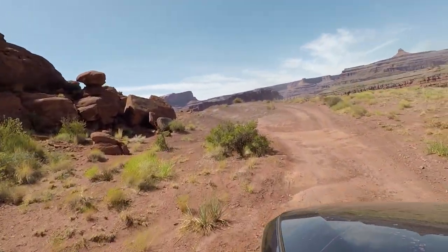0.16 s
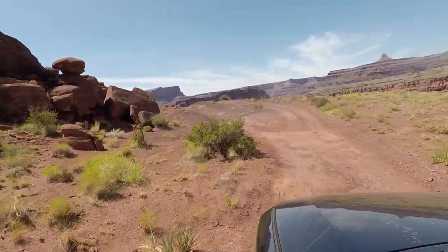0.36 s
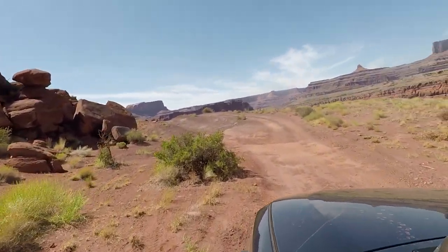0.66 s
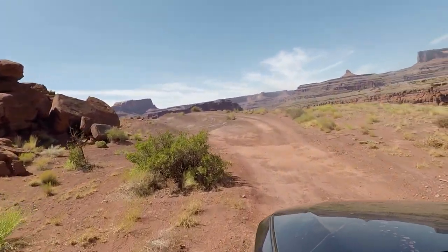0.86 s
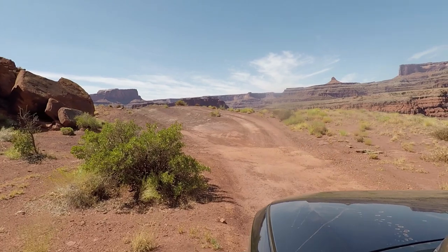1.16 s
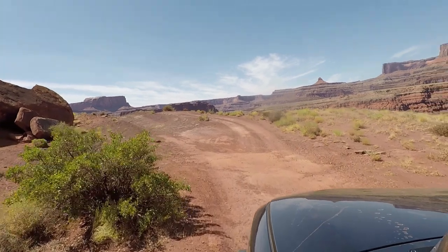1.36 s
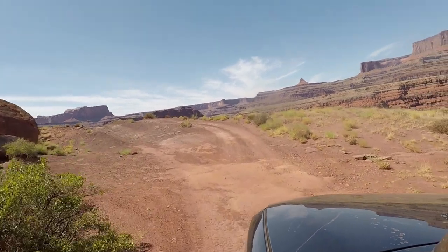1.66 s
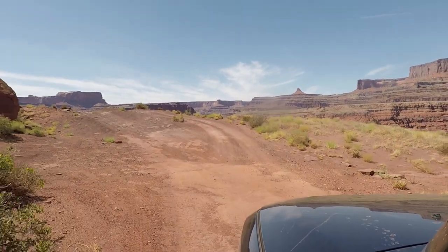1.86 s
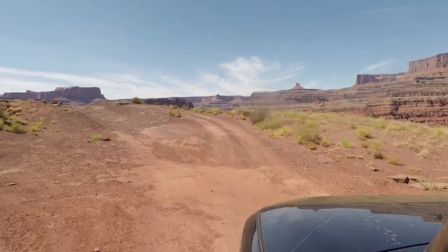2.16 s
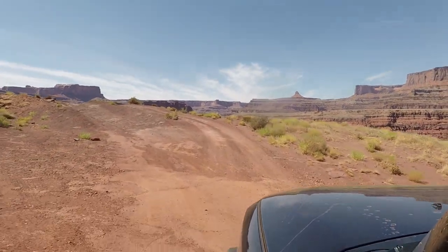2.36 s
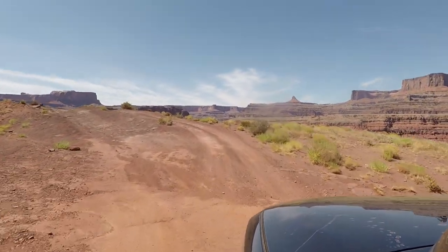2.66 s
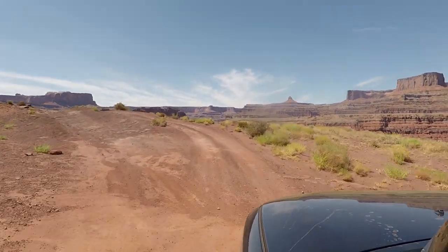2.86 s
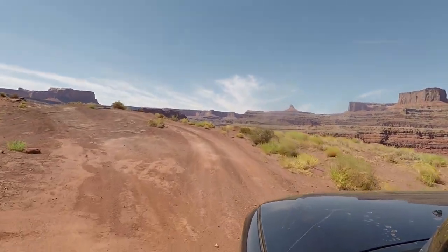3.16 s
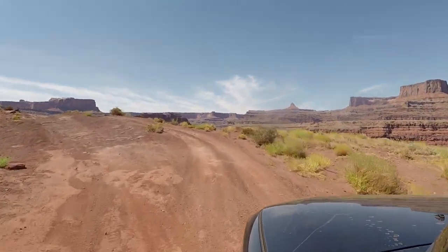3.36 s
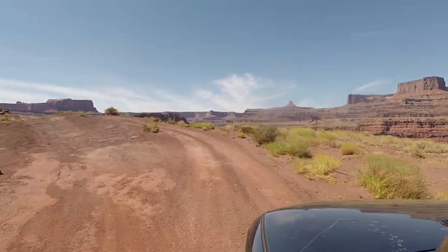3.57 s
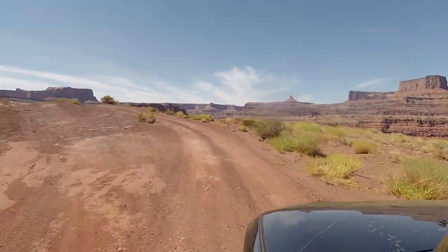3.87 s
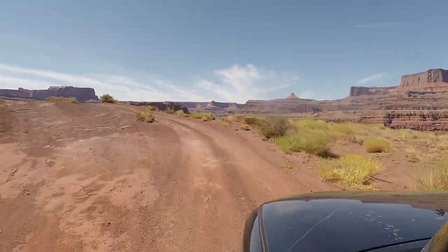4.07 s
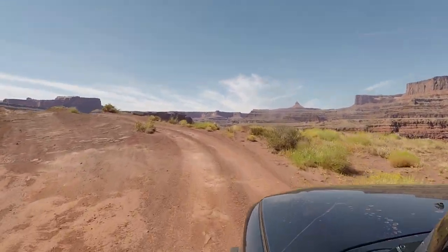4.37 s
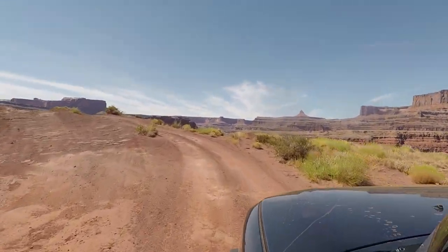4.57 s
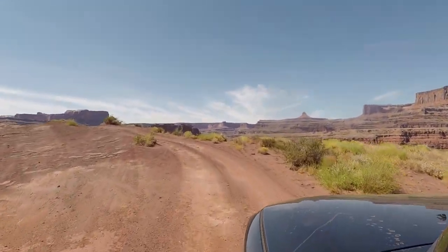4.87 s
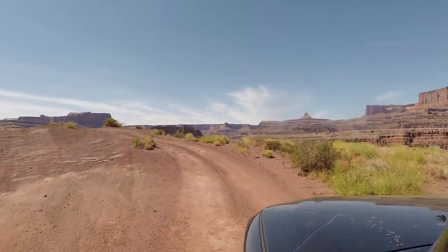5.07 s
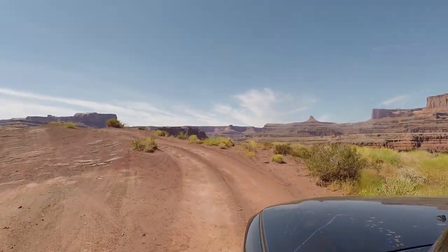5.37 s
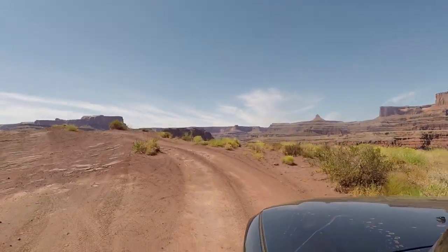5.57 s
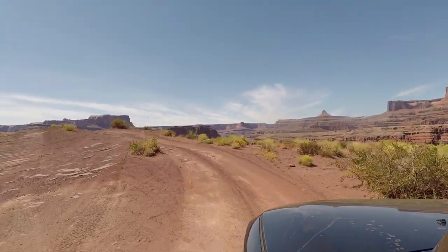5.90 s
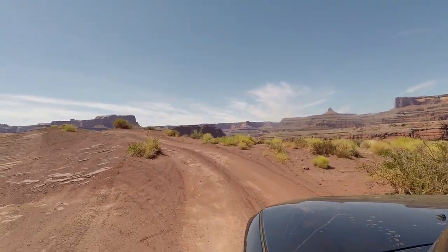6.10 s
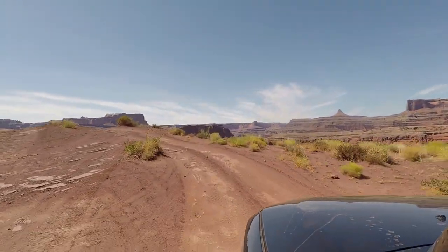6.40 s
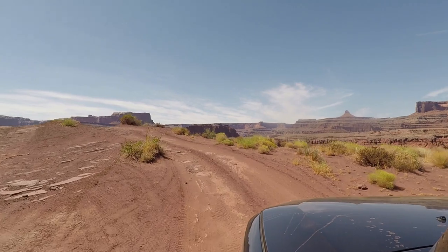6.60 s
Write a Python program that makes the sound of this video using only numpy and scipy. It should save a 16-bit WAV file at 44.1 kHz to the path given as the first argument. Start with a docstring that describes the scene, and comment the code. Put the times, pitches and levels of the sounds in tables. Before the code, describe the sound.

A body-mounted microphone hears tyres rumbling and crunching along a dry dirt track, low thuds from the suspension and bright pebbles snapping against panels. The engine is barely audible at first, then gains a little speed as the bumps thin out. After a brief dip in pitch it takes throttle and swells into a deep, rough climb, with softer crunching, scattered knocks and a late metallic clack beneath it. Dry and outdoors.

```python
"""A V6 off-roader crawls along a rocky dirt trail, heard from a camera on its body.
At first the engine coasts: the body shudders over ruts as swept low sines, shaped noise rumbles and
crunches under the tyres, and struck modes and filtered bursts give suspension knocks and ticking stones.
The coasting engine gains speed and a belt-driven whine stands out twice. Then the engine sags and pulls
hard up a slope: crank-order sines glide through pipe resonances, with a boom and noise pulsed by firings."""
import sys
import numpy as np
from scipy import signal
from scipy.fft import rfft, irfft
from scipy.io import wavfile

SR = 44100
rng = np.random.default_rng(int(sys.argv[2]) if len(sys.argv) > 2 else 0)


def wav_out(sig):
    """Save sig, one row per channel (or a flat mono array), as 16-bit PCM at SR to the path in sys.argv[1]."""
    wavfile.write(sys.argv[1], SR, np.round(np.clip(np.atleast_2d(sig).T, -1, 1) * 32767).astype(np.int16))


N = 297234
TIME = np.arange(N) / SR  # [s]
RING = np.arange(SR // 5) / SR  # time since an impact [s]

# panel resonances that stones and chippings ring: (frequency [Hz], relative level [dB per Hz])
PANELS = [(300, -25), (1000, -8), (1500, 0), (1850, -7), (2200, 1), (2600, -5), (3050, -1), (3400, -7),
          (3900, 1), (4500, -5), (5300, -11), (6600, -12), (7500, -5), (8000, -7), (8700, -4), (10000, -10),
          (12500, -17), (15000, -32)]
# tyres plough through loose patches: (start [s], length [s], spray level [dB], crunch level [dB])
LOOSE_PATCHES = [(0.333, 0.087, -59.5, -39), (0.495, 0.28, -60, -46), (1.077, 0.073, -58, -40.5),
                 (1.216, 0.06, -50.5, -42), (1.297, 0.13, -59.5, -41), (1.513, 0.058, -56, -40),
                 (1.751, 0.2, -52.5, -39.5), (1.805, .14, -52.5, -54), (2.246, 0.17, -58.5, -47)]
PATCH_ATTACK_S, PATCH_RELEASE_S = 0.021, 0.061


def amp(db):
    """Level law: decibels to amplitude gain."""
    return 10 ** (np.asarray(db) / 20)


def unit(x):
    """Power normalization: scales to rms 1."""
    return x / np.sqrt(np.mean(x ** 2) + 1e-20)


def curves(rows):
    """Linear interpolation: each column of a table as a curve over time."""
    s, *columns = np.transpose(rows)
    return [np.interp(TIME, s, column) for column in columns]


def colour(x, points):
    """Spectral shaping: filters x, with a steep fall beyond the end points; rms 1."""
    f, db = np.transpose(points)
    octave = np.log2(np.fft.rfftfreq(len(x), 1 / SR) + 1)
    knots = np.log2(f)
    outside = np.maximum(knots[0] - octave, 0) + np.maximum(octave - knots[-1], 0)
    gain = amp(np.interp(octave, knots, db) - 36 * outside)  # the end level falls 36 dB per octave
    return unit(irfft(rfft(x) * gain, len(x)))


def drift(hz):
    """Low-pass random fluctuation: a Gaussian spectrum fades out around hz; rms 1."""
    f = np.fft.rfftfreq(N, 1 / SR)
    lowpass = np.exp(-(f / hz) ** 2) * (f > 0)
    return unit(irfft(rfft(rng.standard_normal(N)) * lowpass, N))


def grains(per_s, spread_db):
    """Shot noise: random impacts, many small and a few large; rms 1."""
    size = amp(spread_db * np.minimum(rng.exponential(1, N), 4))
    sign = rng.choice([-1, 1], N)
    hit = rng.random(N) < per_s / SR
    return unit(size * sign * hit)


def add(mix, s, sound):
    """Superposition: mixes a sound in at time s."""
    part = mix[round(s * SR):][:len(sound)]
    part += sound[:len(part)]


def swell(start, length, db, attack_s, release_s):
    """Envelope: a linear rise and a hold until the length is over, then exponential decay."""
    age = TIME - start
    rise = np.clip(age / attack_s, 0, 1)
    decay = np.exp(-np.maximum(age - length, 0) / release_s)
    return amp(db) * rise * decay


def together(*gains):
    """Incoherent addition: the level in dB of several gains whose powers add."""
    return 10 * np.log10(sum(g ** 2 for g in gains) + 1e-20)


def strike(modes, scrape, scrape_s):
    """Modal impact: a cushioned blow and a short scrape ring a set of modes; rms 1 over the first 15 ms."""
    ring = np.zeros(len(RING))
    for k, (hz, db, t60) in enumerate(modes):
        swelling = 1 - np.exp(-(2 * hz * RING) ** 2)  # over the first half of the mode's own cycle
        decay = amp(db - 60 * RING / t60)
        ring += (-1) ** k * decay * np.sin(2 * np.pi * hz * RING) * swelling
    contact = rng.standard_normal(len(RING)) * np.exp(-RING / scrape_s)
    contact /= np.linalg.norm(contact)
    sound = ring + scrape * signal.fftconvolve(ring, contact)[:len(RING)]
    return sound / np.std(sound[RING < .015])


def shove(hz):
    """Transient pulse: one dull push and rebound of the body, centred on hz; rms 1 over the first 15 ms."""
    u = np.pi * (hz * RING - .8)
    pulse = (2 * u ** 2 - 1) * np.exp(-u ** 2)
    return pulse / np.std(pulse[RING < .015])


def snap(db, tone, t60):
    """Source and filter: a decaying burst of contact noise rings a resonant shell; db is its peak."""
    burst = rng.standard_normal(len(RING)) * amp(-60 * RING / t60) * (1 - np.exp(-RING / 0.0002))
    f, level = np.transpose(tone)
    frequency = abs(np.fft.fftfreq(len(RING), 1 / SR))
    log_gain = np.log(amp(np.interp(frequency, f, level)))
    # minimum phase: the shell rings after the contact, never before it
    shell = np.exp(np.conj(signal.hilbert(log_gain)))
    sound = np.fft.ifft(np.fft.fft(burst) * shell).real
    return amp(db) * sound / abs(sound).max()


def effort():
    """Engine load in dB relative to a hard pull: low while coasting, high on the climb."""
    # (time [s], effort [dB])
    load = [(0, -56), (1.1, -18), (2.5, -8.5), (3.2, -25), (3.8, -25), (4.4, -14), (4.68, -10.5),
            (5.0, -4.5), (5.27, -0.5), (5.9, 0.5), (6.33, 1.5), (6.7, 1.5)]
    return curves(load)[0]


def ground():
    """Powers of the trail, its ledges and loose patches add: levels in dB of rumble, drum, crunch and grit."""
    # the trail under the tyres: (time [s], rumble level [dB], gravel crunch level [dB])
    trail = [(0, -20.5, -41), (.3, -28.5, -44.5), (1.4, -24, -40.5), (1.65, -28, -40), (2.12, -20.5, -44),
             (2.4, -23, -43.5), (3.17, -23, -46.5), (3.7, -31.5, -50.5), (4.2, -30.5, -48),
             (4.7, -32.5, -47), (5.05, -33, -47.5), (5.5, -30, -37.5), (6.05, -24, -45), (6.7, -26.5, -43)]
    # the wheels drop over ledges: (start [s], length [s], rumble level [dB], drumming level [dB])
    ledges = [(0.491, 0.18, -19.5, -32.5), (0.748, 0.099, -20, -36), (1.086, 0.23, -32.5, -32.5),
              (1.789, 0.15, -22.5, -23.5), (1.97, 0.089, -19, -41), (2.423, 0.24, -22, -49)]
    ledge_attack_s, ledge_release_s = 0.04, 0.092
    # pebbles on the tread: base dB; dB per dB of trail rumble; dB gained in a hard pull
    drum_db, drum_growth, drum_climb_db = -34, 0.069, 3.5
    # sand thrown up on firm ground: base dB; dB per dB of trail crunch
    grit_db, grit_growth = -60, 0.38

    lumps_db, gravel_db = curves(trail)
    thuds = [swell(s, length, db, ledge_attack_s, ledge_release_s) for s, length, db, _ in ledges]
    scrapes = [swell(s, length, db, ledge_attack_s, ledge_release_s) for s, length, _, db in ledges]
    sprays = [swell(s, length, db, PATCH_ATTACK_S, PATCH_RELEASE_S) for s, length, db, _ in LOOSE_PATCHES]
    crunches = [swell(s, length, db, PATCH_ATTACK_S, PATCH_RELEASE_S) for s, length, _, db in LOOSE_PATCHES]
    pebbles_db = drum_db + drum_growth * (lumps_db - lumps_db.mean()) + drum_climb_db * amp(effort())
    sand_db = grit_db + grit_growth * (gravel_db - gravel_db.mean())
    return (together(amp(lumps_db), *thuds), together(amp(pebbles_db), *scrapes),
            together(amp(gravel_db), *crunches), together(amp(sand_db), *sprays))


def scatter():
    """Shot noise through panel resonances: separate chippings patter wherever the tyres plough a loose patch."""
    spray = sum(swell(s, length, db, PATCH_ATTACK_S, PATCH_RELEASE_S) for s, length, db, _ in LOOSE_PATCHES)
    relative_to_spray_db = -7
    return amp(relative_to_spray_db) * spray * colour(grains(per_s=130, spread_db=3.0), PANELS)


def stones():
    """Impact excitation of panel resonances: each stone snaps on a panel, brightest around its own centre."""
    # (time [s], peak level [dB], centre [Hz], t60 of the contact burst [s])
    hits = [(0.329, -40, 8000, 0.023), (.363, -44, 8000, .015), (0.384, -32.5, 2200, 0.011),
            (.4314, -39, 7000, .02), (0.602, -40, 2200, 0.017), (.6494, -45, 2500, 0.017),
            (.732, -50, 3500, 0.018), (0.787, -44, 2000, 0.023), (0.849, -42, 2500, .02),
            (1.0702, -43, 3500, .012), (1.1169, -42, 8000, .02), (1.139, -41, 4000, .015),
            (1.24, -36, 4800, 0.0069), (1.253, -39, 3300, .06), (1.266, -40, 3400, 0.032),
            (1.285, -41, 7500, 0.0072), (1.333, -43, 2200, .02), (1.391, -42, 6000, .02),
            (1.551, -46, 2400, .015), (1.578, -48, 7940, .012), (1.589, -36, 1900, 0.03),
            (1.602, -41, 4200, 0.024), (1.724, -40, 1600, 0.018), (1.8093, -32, 3700, 0.041),
            (1.837, -26, 2000, 0.027), (1.965, -40, 7000, .012), (1.991, -46, 10000, 0.0078),
            (2.051, -30, 7000, 0.009), (2.276, -41, 8000, .015), (2.316, -46, 9000, .012),
            (2.412, -41, 7560, 0.01), (2.708, -46, 7000, 0.011), (2.772, -33, 2200, 0.017),
            (2.92, -46, 7000, 0.013), (3.168, -40.5, 2900, 0.021), (3.402, -47, 8000, .025),
            (4.468, -45, 8100, .02), (5.333, -48, 7950, 0.017), (5.473, -41, 6000, 0.022),
            (5.999, -40.5, 9500, 0.016), (6.3366, -27, 1708, 0.03), (6.338, -30, 4200, 0.025),
            (6.3425, -27, 2370, 0.052)]
    out = np.zeros(N)
    for s, db, centre_hz, t60 in hits:
        tone = [(hz, level - 2.5 * np.log2(hz / centre_hz) ** 2) for hz, level in PANELS]
        add(out, s, snap(db, tone, t60))
    return out


def chips():
    """Impact excitation of a small shell: a chip rings the camera housing."""
    # housing resonances: (frequency [Hz], relative level [dB per Hz])
    housing = [(900, -8), (1800, 0), (2300, -5), (2800, 0), (3600, 0), (4300, -4), (5000, 1), (6000, -7),
               (7200, -6), (9000, -12), (11000, -17), (15000, -18)]
    # (time [s], peak level [dB], t60 of the contact burst [s])
    hits = [(1.165, -20, 0.0059)]
    out = np.zeros(N)
    for s, db, t60 in hits:
        add(out, s, snap(db, housing, t60))
    return out


def loose_fitting():
    """Modal impact: jolts make a loose fitting clack, each weighting its modes around a centre."""
    # (time [s], level over the first 15 ms [dB], centre [Hz])
    clacks = [(0.326, -40, 1630), (1.543, -44, 1500), (1.579, -43, 1444), (1.838, -33.5, 1710),
              (1.861, -36, 1620), (1.925, -42, 1150), (2.006, -42, 1150), (2.771, -39.5, 1420),
              (3.4, -43, 1410), (3.864, -49, 1240), (4.006, -43.5, 1200), (4.085, -46, 1100),
              (4.181, -50, 1900), (4.257, -44.5, 1190), (4.468, -45, 1200), (4.58, -59, 1400),
              (4.951, -41, 1210), (6.339, -32, 1440), (6.35, -31, 1218)]
    # modes before that weighting: (frequency [Hz], level [dB], t60 [s])
    fitting = [(1090, -3, .04), (1215, 0, .055), (1330, -4, .04), (1450, -4, .035), (1650, -7, .02),
               (1900, -8, .015), (2700, -12, .02), (3400, -16, .02)]
    out = np.zeros(N)
    for s, db, centre_hz in clacks:
        modes = [(hz, level - min(30 * np.log2(hz / centre_hz) ** 2, 8), t60) for hz, level, t60 in fitting]
        add(out, s, amp(db) * strike(modes, scrape=0.72, scrape_s=0.014))
    return out


def knocks():
    """Rigid-body and modal response: suspension blows shove the body and ring the chassis around a centre."""
    # (time [s], approximate level over the first 15 ms [dB], centre [Hz])
    blows = [(0.078, -28.5, 410), (0.611, -18.5, 151), (0.655, -24, 200), (0.672, -12, 137),
             (0.687, -21, 450), (0.6938, -27, 420), (0.6987, -13.5, 232), (0.777, -18, 133),
             (0.805, -23, 130), (1.759, -28, 625), (1.816, -28, 440), (1.84, -15.5, 238),
             (1.844, -22.5, 550), (1.867, -24, 473), (1.883, -20, 330), (1.896, -24, 497), (1.91, -16, 253),
             (1.927, -31, 517), (1.959, -19, 239), (1.972, -38, 540), (2.002, -18, 290),
             (2.021, -26.5, 500), (2.577, -35, 400), (2.745, -38, 500), (2.849, -39, 380),
             (2.989, -43, 480), (3.139, -36, 480), (3.256, -36, 477), (3.886, -29, 367),
             (4.245, -24.5, 199), (5.076, -21, 470), (5.332, -36.5, 526), (5.705, -35, 420),
             (6.229, -25, 258), (6.465, -29, 557)]
    # chassis modes before weighting around the centre: (frequency [Hz], level [dB], t60 [s])
    chassis = [(92, -1, .09), (135, -2, .08), (178, -1, .06), (270, 1, .05), (325, -4, .04),
               (430, -1, .035), (505, 0, .045), (590, -3, .035), (735, -7, .03), (860, -6, .03),
               (1180, -11, .025), (1560, -11, .02)]
    # the shove relative to the ring; it fades for blows centred above this pitch
    push_ratio, push_hz = 1.2, 256
    out = np.zeros(N)
    for s, db, centre_hz in blows:
        modes = [(hz, level - 5 * np.log2(hz / centre_hz) ** 2, t60) for hz, level, t60 in chassis]
        ring = strike(modes, scrape=0.6, scrape_s=0.004)
        push = push_ratio * min(push_hz / centre_hz, 1)
        add(out, s, amp(db) * (ring + push * shove(centre_hz)) / np.hypot(1, push))
    return out


def tyres():
    """Broadband contact noise: lumps rumble, pebbles drum on the tread, gravel crunches, sand sprays in clumps."""
    # four spectra, each (frequency [Hz], relative level [dB per Hz])
    rumble_tone = [(38, -3.5), (55, 5.5), (74, 2.5), (92, 1.5), (125, 0.5), (160, -3.5), (210, -12.5),
                   (320, -47)]
    drum_tone = [(120, -41), (190, -3), (250, 4), (320, 0.5), (390, -2), (480, -2), (600, -7), (780, -10),
                 (1000, -29.5), (1600, -54)]
    crunch_tone = [(450, -18), (800, 5), (980, 2), (1200, 3), (1500, -4), (1900, -11), (2600, -22),
                   (3600, -27.5), (6000, -45)]
    grit_tone = [(1200, -33), (2200, 8.5), (3000, 8), (4000, 0.5), (5200, -7), (6400, -4.5), (7600, -1.5),
                 (9200, -4.5), (11000, -12.5), (14000, -31)]
    rumble_db, drum_db, crunch_db, grit_db = ground()
    rumble = amp(rumble_db) * colour(rng.standard_normal(N), rumble_tone)
    drum = amp(drum_db + 0.77 * drift(hz=30.0)) * colour(grains(per_s=1400, spread_db=1.5), drum_tone)
    crunch = amp(crunch_db + 1.9 * drift(hz=30)) * colour(grains(per_s=5300, spread_db=2.5), crunch_tone)
    grit = amp(grit_db + 1.4 * drift(hz=40)) * colour(grains(per_s=2800, spread_db=0.5), grit_tone)
    return rumble + drum + crunch + grit


def shudder():
    """Softening resonance: ruts swing the body at its lowest mode, with an uneven judder."""
    # ruts that set the body shuddering: (start [s], length [s], swing level [dB])
    ruts = [(0, .2, -19.5), (.22, .24, -13), (.46, .38, -17), (.99, .15, -11.5), (1.21, .23, -12.5),
            (1.57, .06, -20.5), (1.74, .27, -13.5), (2.12, .08, -19), (2.27, .55, -16), (2.9, .07, -16),
            (3.06, .05, -17), (3.19, .11, -14.5), (3.42, .1, -17.5), (3.86, .16, -19), (4.18, .06, -23.5),
            (4.45, .85, -24), (5.33, .37, -15), (5.84, .17, -21), (6.09, .12, -15), (6.33, .19, -18),
            (6.61, .07, -16)]
    # the uneven part of the shake: (frequency [Hz], relative level [dB per Hz])
    judder_tone = [(30, -22.5), (37, 17.5), (44, 13), (54, 4), (75, -18.5), (100, -38)]
    attack_s, release_s, rest_db = .05, .06, -36
    small_swing_hz, sag_hz = 30.5, 13  # the sag is per unit of amplitude
    judder_db, judder_growth = -17, 0.48  # level under a full swing; dB per dB of swing

    db = together(amp(rest_db), *(swell(*rut, attack_s, release_s) for rut in ruts))
    hz = small_swing_hz - sag_hz * amp(db)  # the mounts soften in a wide swing
    swing = np.sqrt(2) * np.sin(2 * np.pi * np.cumsum(hz) / SR)
    judder = amp(judder_db + judder_growth * db) * colour(rng.standard_normal(N), judder_tone)
    return amp(db) * swing + judder


def crank_turns(crank_hz):
    """Phase integration: crank turns so far, the speed wavering more on rough ground."""
    # share by which the speed wavers at the mean rumble level; dB per dB of rumble
    flutter_share, flutter_growth = 0.0043, 1.22
    rumble_db = ground()[0]
    # rough ground tugs at the driveline
    flutter = flutter_share * amp(flutter_growth * (rumble_db - rumble_db.mean()))
    return np.cumsum(crank_hz * (1 + flutter * drift(hz=10.0))) / SR


def exhaust_note(turns, crank_hz, note_db):
    """Harmonic synthesis: crank orders glide through the fixed resonances of the pipe."""
    # (multiple of the crank speed [1], relative level [dB])
    orders = [(2, -3.5), (3, 0.5), (3.5, -10), (4.5, -25.5), (5, -10.5), (5.5, -22), (6, -6), (6.5, -15.5),
              (7, -11), (7.5, -13.5), (8, -13.5), (9, -15), (10, -16.5), (10.5, -21.5), (12, -17.5),
              (13, -24.5), (13.5, -23), (15, -27), (16.5, -27.5), (21, -22.5)]
    # pipe resonances: (frequency [Hz], gain [dB])
    pipe = [(60, 0.5), (200, -2), (255, -0.5), (350, -5), (460, 5), (520, -2.5), (585, 9.5), (640, 1.5),
            (900, -2.5)]
    note = np.zeros(N)
    for order, db in orders:
        uneven_db = 1.12 * drift(hz=4.4)  # no two burns are alike
        pipe_db = np.interp(order * crank_hz, *np.transpose(pipe))
        phase = 2 * np.pi * (order * turns + rng.random())
        note += amp(note_db + db + pipe_db + uneven_db) * np.cos(phase)
    return np.sqrt(2) * note  # so that the levels are rms


def pipe_boom(turns, note_db):
    """Resonant reinforcement: one crank order booms in the pipe while the engine picks up speed."""
    # (start [s], length [s], level [dB])
    pull = (4.63, 0.97, -17.8)
    order, attack_s, release_s = 4, .48, 0.081
    rest_db = -8.5  # outside the pull it stays this far under the note
    boom_db = together(amp(note_db + rest_db), swell(*pull, attack_s, release_s))
    boom = amp(boom_db + 1.1 * drift(hz=6)) * np.sin(2 * np.pi * order * turns)
    return np.sqrt(2) * boom


def firing_roar(turns):
    """Amplitude modulation: each firing puffs noise, which grows with the engine's effort."""
    # (frequency [Hz], relative level [dB per Hz])
    roar_tone = [(40, -27), (65, -13), (100, -5), (150, 8.5), (200, -0.5), (260, 3), (320, -1.5),
                 (390, -8.5), (490, -10), (650, -12), (950, -26), (1280, -27), (1650, -31), (2100, -38.5),
                 (3800, -46), (5500, -56), (9000, -63.5), (13000, -77)]
    roar_db = -20 + effort()
    # three firings a turn, one cylinder bank louder than the other
    puffs = 1 + .3 * np.cos(2 * np.pi * 3 * turns) + .2 * np.cos(np.pi * 3 * turns)
    noise = colour(rng.standard_normal(N), roar_tone)
    return noise * unit(puffs) * amp(roar_db + 1.2 * drift(hz=25))


def belt_whine(crank_hz):
    """Geared rotation: a belt-driven part whines at a fixed multiple of the crank speed."""
    # the whine stands out while coasting: (start [s], length [s], level [dB])
    whines = [(2.52, 0.55, -62.5), (3.481, 0.43, -62)]
    order, attack_s, release_s, rest_db = 41, 0.18, .04, -70
    whine_db = together(amp(rest_db), *(swell(*row, attack_s, release_s) for row in whines))
    tone = np.sin(2 * np.pi * order * np.cumsum(crank_hz) / SR)
    return np.sqrt(2) * tone * amp(whine_db + 1.5 * drift(hz=12))


def engine():
    """Periodic excitation: one crank drives the exhaust note, pipe boom, firing roar and belt whine."""
    # (time [s], crank speed before flutter [turns per second, Hz])
    crank = [(0, 38), (1.4, 38), (2.1, 40.5), (2.55, 44.8), (2.8, 42.6), (3.1, 41.7), (3.4, 37.8),
             (3.8, 35.3), (4.2, 37.5), (4.66, 24), (4.76, 25.8), (4.88, 29.9), (5, 32.9), (5.2, 35.7),
             (5.4, 37.7), (5.8, 38.65), (6.2, 40), (6.5, 39.3), (6.74, 37.5)]
    # exhaust note ahead of its order and pipe gains: (time [s], level [dB])
    note_level = [(0, -44.5), (1.1, -37), (2.5, -33), (3.4, -35), (4.1, -35.5), (4.6, -42.5), (4.8, -44),
                  (5.0, -25.5), (5.25, -22), (5.5, -24), (6.0, -22.5), (6.4, -27), (6.7, -21.5)]
    crank_hz = curves(crank)[0]
    note_db = curves(note_level)[0]
    turns = crank_turns(crank_hz)
    note = exhaust_note(turns, crank_hz, note_db)
    return note + pipe_boom(turns, note_db) + firing_roar(turns) + belt_whine(crank_hz)


def scene():
    """Superposition: everything reaches one microphone in open air."""
    impacts = scatter() + stones() + chips() + loose_fitting() + knocks()
    return (impacts + tyres() + shudder() + engine())[None]


def record(dry):
    """Additive noise and low-pass filtering: the microphone's own hiss, then the band limit."""
    # (frequency [Hz], relative level [dB per Hz])
    hiss_tone = [(2650, -10.5), (4500, -4), (5180, -9), (6000, -5.5), (6400, -11.5), (8110, -17),
                 (8710, -3.5), (9200, -4.5), (12600, -16), (15000, -21.5)]
    hiss_db, edge_hz = -64.5, 15300
    hiss = amp(hiss_db) * colour(rng.standard_normal(N), hiss_tone)
    band_limit = signal.firwin(511, edge_hz, window=("kaiser", 9), fs=SR)
    return signal.oaconvolve(dry + hiss, band_limit[None], "same")


dry = scene()
out = record(dry)
wav_out(out)
```